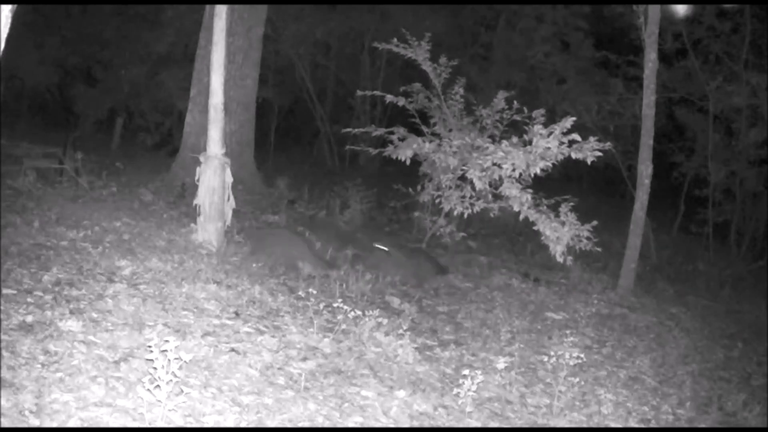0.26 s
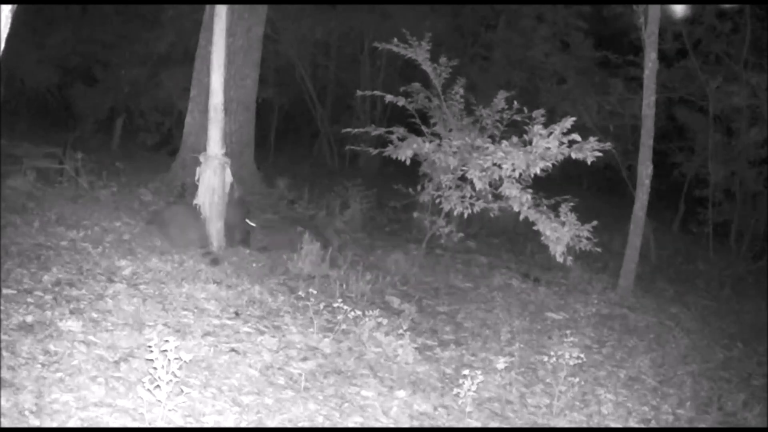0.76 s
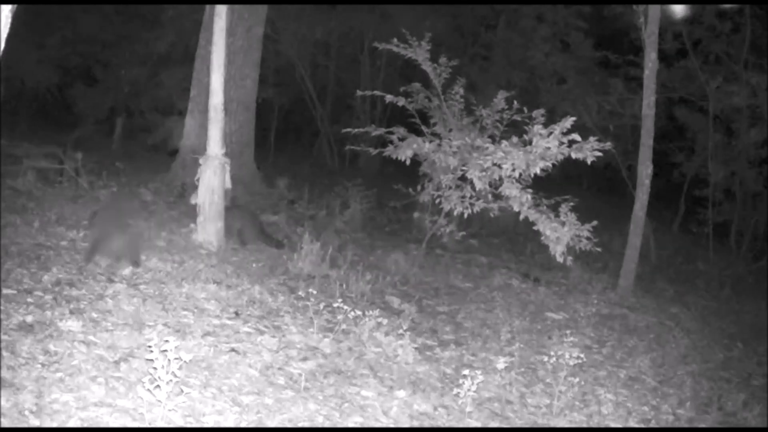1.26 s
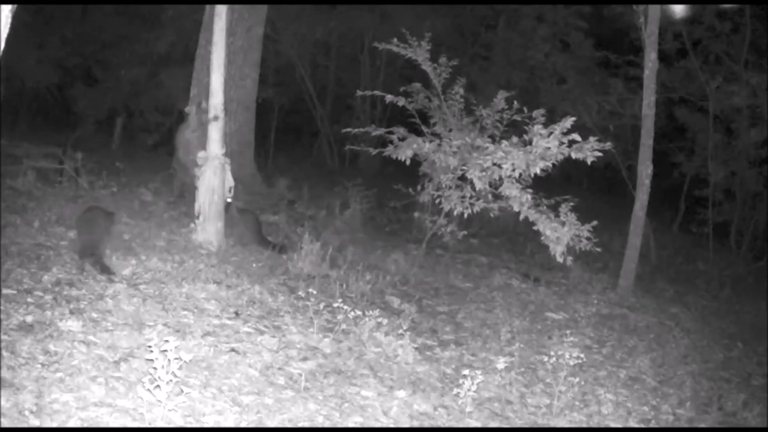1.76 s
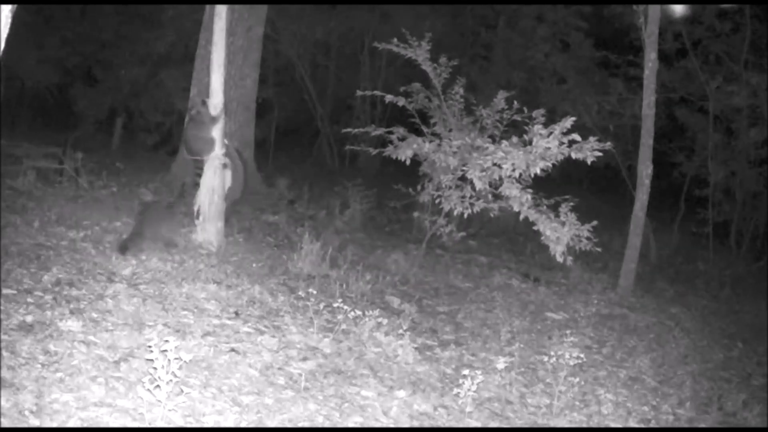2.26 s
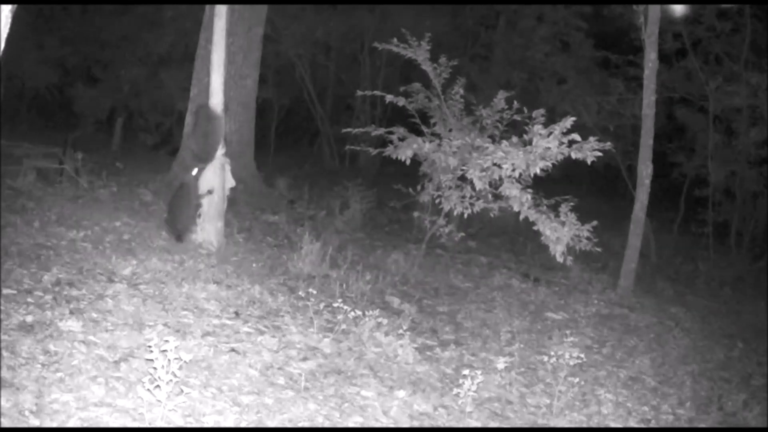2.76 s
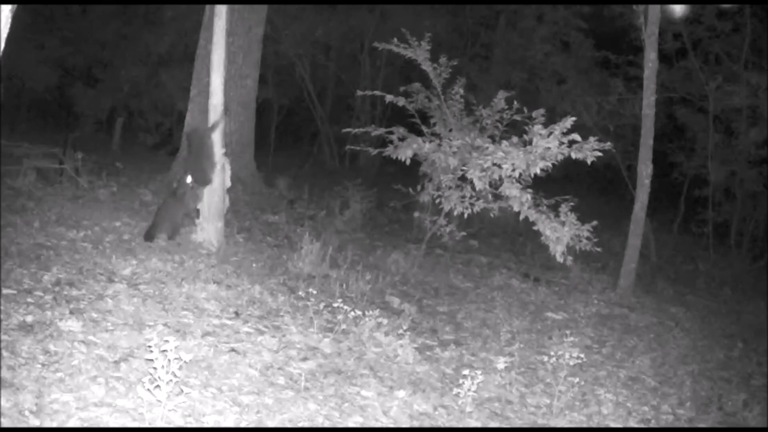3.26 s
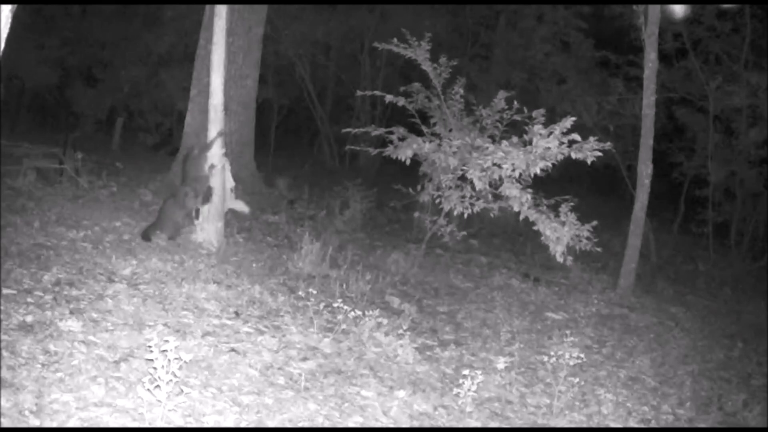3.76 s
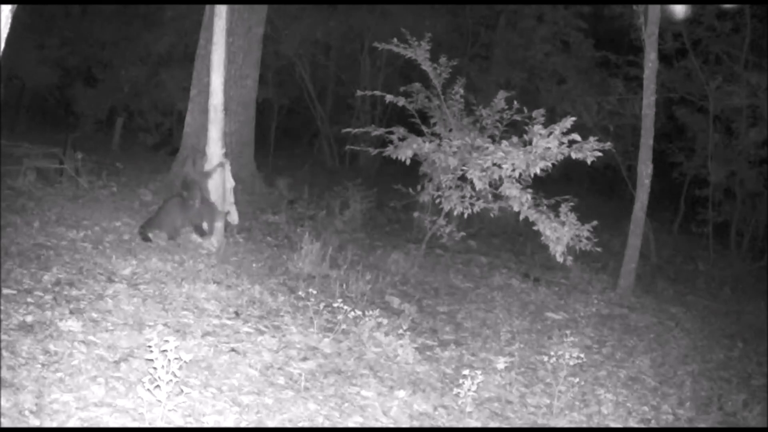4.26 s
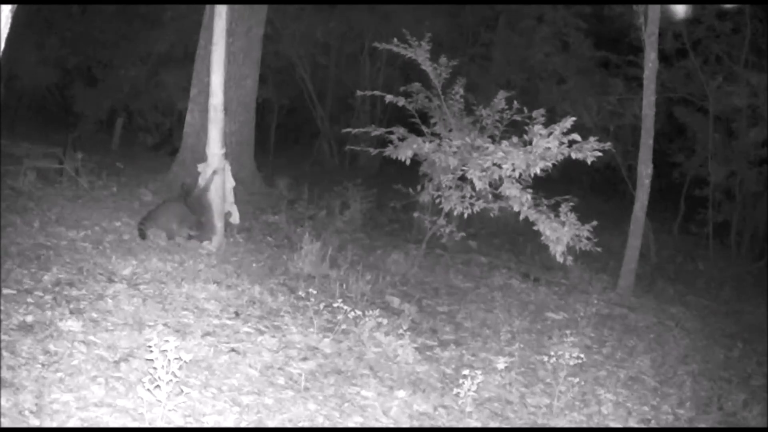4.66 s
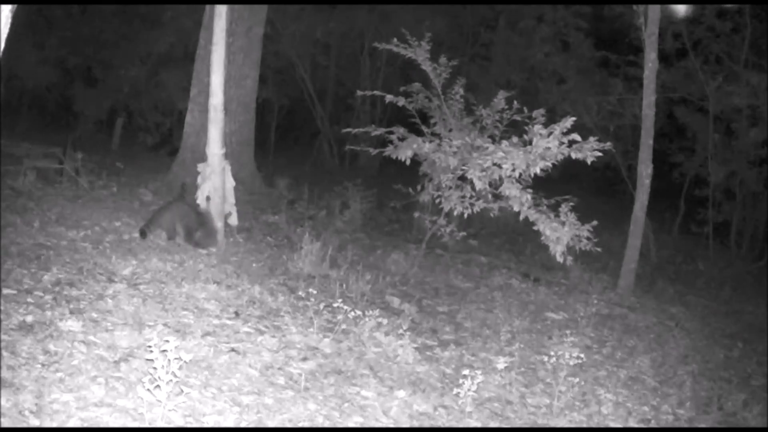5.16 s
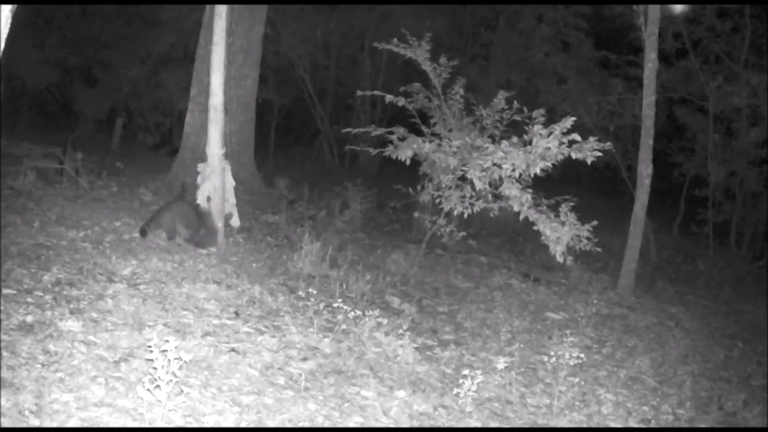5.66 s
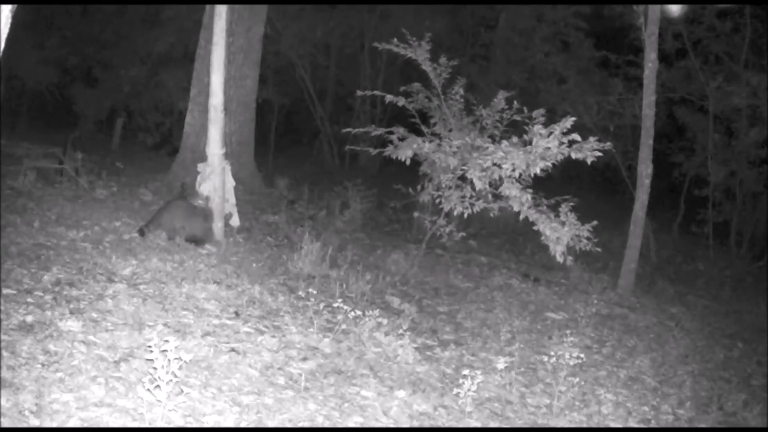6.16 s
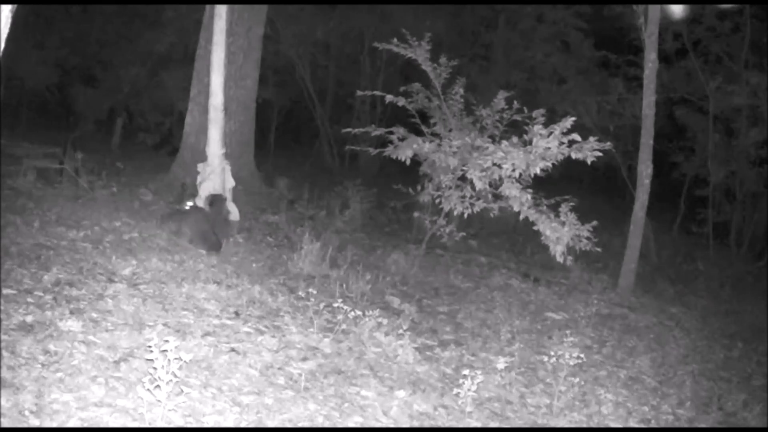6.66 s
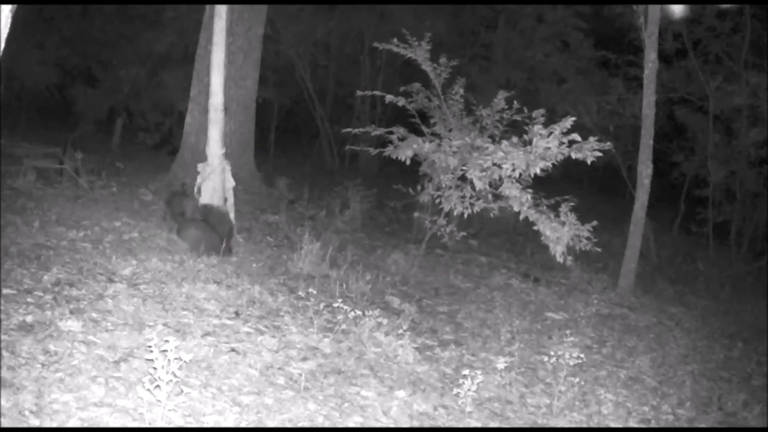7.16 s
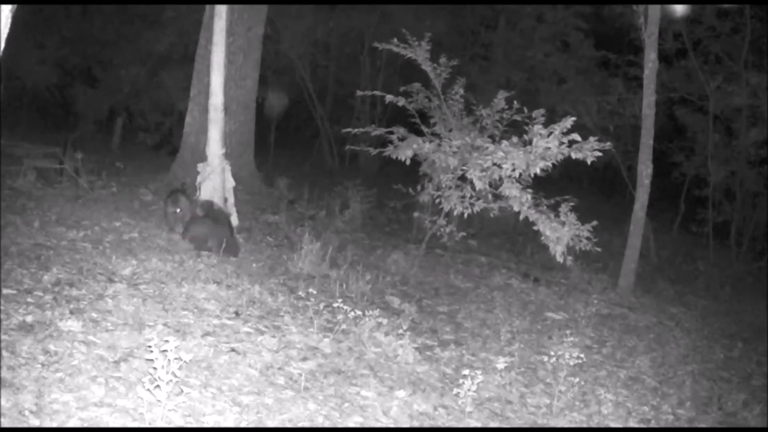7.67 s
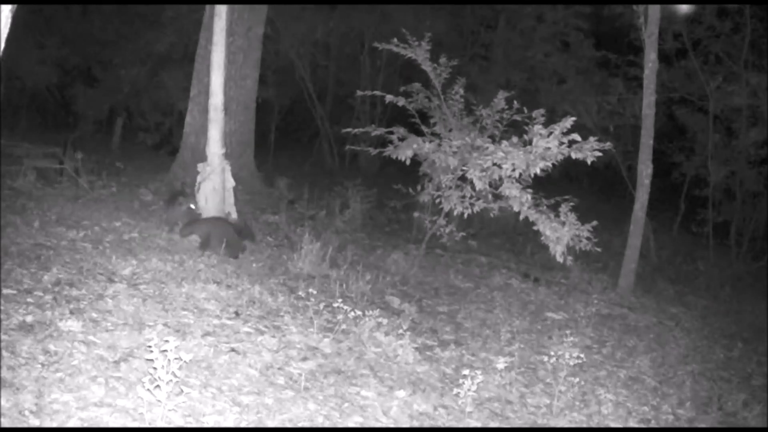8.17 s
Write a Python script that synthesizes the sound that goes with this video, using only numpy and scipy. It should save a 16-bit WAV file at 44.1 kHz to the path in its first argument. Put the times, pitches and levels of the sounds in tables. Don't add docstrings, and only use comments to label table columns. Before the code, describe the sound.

A dense high cricket chorus pulses steadily at night while katydids rasp short phrases and small animals rustle leaves and snap twigs.

```python
import sys
import numpy as np
from scipy import signal
from scipy.fft import rfft, irfft, dct, next_fast_len
from scipy.io import wavfile
from scipy.ndimage import map_coordinates

SR = 44100
rng = np.random.default_rng(int(sys.argv[2]) if len(sys.argv) > 2 else 0)


def invert_db(level):
    return 10 ** (np.asarray(level, dtype=float) / 20)


def master_out(mix):
    frames = np.transpose(np.atleast_2d(mix))
    ceiling = np.clip(frames, -1, 1)
    pcm = np.round(ceiling * 32767).astype(np.int16)
    wavfile.write(sys.argv[1], SR, pcm)


N = 370881

# (frequency [Hz], level [dB/Hz])
HIGH_BLUR = [(3290, -47.5), (5680, -26), (6140, 0), (6310, 4.5), (6590, 0), (7000, -10), (9100, -52),
             (15400, -120)]
# (frequency [Hz], level [dB/Hz])
HIGH_SKIRT = [(3940, -30.5), (6700, -7), (6950, -11), (7260, -8.5), (7950, -23.5), (8130, -41), (8250, -38),
              (10700, -65.5), (18200, -120)]
# (peak time [s], lift [dB])
CHIRPS = [(.06, 3.5), (.45, 5), (.8, 2.5), (1.2, 3.5), (1.55, 2), (1.92, 1.5), (2.2, 1.5), (2.49, 1.5),
          (2.81, 3.5), (3.16, 4), (3.5, 2), (3.87, 1.5), (4.21, 3), (4.6, 3.5), (4.93, 2.4), (5.29, 3),
          (5.68, 2), (6.04, 2.5), (6.38, 3.5), (6.8, 2), (7.12, 1.2), (7.49, 2), (7.85, 3), (8.22, 3.5)]
# (frequency [Hz], level [dB/Hz])
LOW_BLUR = [(1210, -41), (2050, -15.5), (2270, 6), (2360, 0.5), (2490, -8.5), (2600, -17), (3380, -37),
            (5720, -120)]
# (time [s], level [dB])
LOW_COURSE = [(0.0, -66), (1.17, -70.5), (2.62, -69.5), (3.35, -68.5), (4.36, -69), (4.89, -68),
              (5.36, -70), (5.76, -66.5), (6.7, -68.5), (7.89, -65.5), (8.27, -67.5), (8.41, -68.5)]
# (frequency [Hz], level [dB rms])
MAINS_LINES = [(120, -65.8), (240, -78.5), (360, -88), (60, -74)]
# (frequency [Hz], level [dB/Hz])
AIR_SPECTRUM = [(88, -39.5), (150, -8), (167, -10), (291, -13.5), (1640, -17), (2300, -17.5), (2610, -16),
                (4340, -17.5), (5550, -21.5), (6000, -6), (7800, -25.5), (13200, -120)]
# (frequency [Hz], level [dB/Hz])
RUMBLE_SPECTRUM = [(12, -35.5), (20, -3.5), (48, 1.5), (76, 2.5), (119, -2), (141, -4), (171, -15.5),
                   (220, -13.5), (290, -38.5), (480, -120)]
# (time [s], level [dB], length [s], centre [Hz], width [Hz])
PAW_SCUFFS = [(0.038, -70, 0.036, 1500, 2030), (0.536, -57.5, 0.1, 2100, 2600),
              (0.547, -64.5, 0.038, 400, 503), (0.928, -66, .12, 1500, 2500),
              (1.283, -49, 0.048, 6270, 5000), (1.293, -57.5, 0.044, 1000, 1800),
              (1.298, -63.5, 0.026, 330, 300), (1.33, -60, 0.18, 2180, 4000),
              (1.428, -53.5, 0.093, 4060, 5000), (2.198, -65.5, .05, 1010, 1200),
              (2.679, -66, .15, 1200, 1500), (3.209, -64, 0.31, 1190, 2010), (3.69, -61, 0.023, 204, 201),
              (4.685, -59.5, .03, 1500, 1500), (4.73, -65, 0.14, 1600, 1200),
              (4.997, -73, 0.14, 1180, 1500), (6.258, -60.5, .025, 280, 298),
              (6.982, -63, .018, 5000, 1490), (7.086, -60, 0.024, 1780, 352),
              (7.142, -60.5, 0.019, 4900, 1200), (8.338, -64, 0.038, 395, 150)]
# (time [s], peak [dB], main mode [Hz], low mode over main [dB], high modes over main [dB])
TWIG_SNAPS = [(0.059, -54, 1400, -1.5, 4), (0.531, -58.5, 1600, 4, 7), (0.931, -62, 1670, -1, 9),
              (1.01, -54, 1640, -11, -1), (2.046, -59, 902, 1.5, -6.5), (2.064, -41, 1720, -6, -4),
              (2.149, -56.5, 934, -5, -5), (2.349, -44.5, 1420, -15, -9.5), (2.609, -51.5, 1490, -23, -12),
              (2.921, -40, 1490, -3.5, -1), (3.191, -46, 1500, -9, -13), (3.219, -54, 1190, -12, -0.5),
              (3.255, -57, 1070, -18, 5.5), (3.731, -53, 1390, -18, -10), (3.777, -45, 1030, -5, -8.5),
              (4.047, -51.5, 1410, -16, -7), (4.118, -52.5, 1750, -24, -1.5), (4.695, -51, 1500, -13, -7),
              (5.683, -53.5, 1300, -16, -9), (6.601, -58.5, 950, 1.5, 11.5), (7.056, -56, 1760, -16, -13),
              (7.068, -46.5, 1820, -20, -22), (8.131, -60.5, 1000, 3.5, -6), (8.246, -50.5, 1150, -5.5, 2)]
# (frequency [Hz], width [Hz], level [dB])
WOOD_LOW = [(445, 606, 0)]
# (frequency [Hz], width [Hz], level [dB])
WOOD_HIGH = [(2920, 790, 0.5), (4470, 1000, 1.5), (7250, 1500, -2.5)]
# (time [s], level [dB])
NEAR_PHRASES = [
    (.213, -62),
    (1.525, -61),
    (3.01, -60.5),
    (4.538, -60.5),
    (6.022, -60.5),
    (7.455, -61),
]
# (time [s], level [dB])
FARTHER_PHRASES = [
    (1.33, -62),
    (3.848, -62),
]
# (frequency [Hz], width [Hz], level [dB])
NEAR_WING_MODES = [(3400, 1300, -4.5), (4830, 850, -0.5), (7540, 800, -6.5)]
# (frequency [Hz], width [Hz], level [dB])
FARTHER_WING_MODES = [(5000, 680, -0.5), (3354, 240, 2.5), (4340, 1500, -10.5)]
FAINT_LOSSES = [.119, .544, .653, .823, .865, 1.506, 2.487, 2.553, 3.406, 3.532, 3.68, 3.811, 4.152, 5.153,
                5.58, 5.645, 6.327, 6.946, 7.117, 7.203]

CHORUS_DB, FLUTTER_DB = -52.5, 0.76
CHIRP_RISE_S, CHIRP_FALL_S = 0.071, 0.125
SKIRT_DB, SKIRT_DRIFT_DB = -67.3, -0.5
AIR_DB, AIR_FADE_DB_PER_S = -67, 0.3051
RUMBLE_DB, HEAVE_DB = -64.3, 1.86
STROKE_GAP_S, STROKE_S = 0.099, 0.096
WARM_UP_DB = -1
LOSS_STEP_DB = 10.8
TOP_HZ = 8230


def unit(x):
    return x / np.sqrt(np.mean(x ** 2) + 1e-20)


def curves(rows):
    s, *cols = np.transpose(rows)
    return [np.interp(np.arange(N) / SR, s, c) for c in cols]


def wobble(rate):
    coarse = np.arange(0, N + 64, 64)
    knots = rng.standard_normal(int(N * rate / SR) + 5)
    return np.interp(np.arange(N), coarse, map_coordinates(knots, [coarse * rate / SR]))


def filtered(x, response):
    m = next_fast_len(len(x) + 2048)
    return irfft(rfft(x, m) * response(np.fft.rfftfreq(m, 1 / SR)), m)[:len(x)]


def noise(spectrum):
    hz, db = np.transpose(spectrum)
    shape = lambda f: invert_db(np.interp(np.log(f + 1), np.log(hz), db))
    return unit(filtered(rng.standard_normal(N), shape))


def steep(x, modes):
    def ring(f):
        total = 0
        for k, (centre, width, db) in enumerate(modes):
            damping = 1j * f * width
            total = total + (-1) ** k * invert_db(db) * damping / (centre ** 2 - f ** 2 + damping)
        return total
    return filtered(x, lambda f: ring(f) ** 2)


def trill(centre_hz, spread_hz, pulse_rate, glide_hz, swell_db, count):
    out = np.zeros(N)
    for pitch, (pace, size, start) in zip(np.linspace(-1.4, 1.4, count), rng.standard_normal((count, 3))):
        strokes_per_s = pulse_rate * (1 + 0.18 * pace + 0.06 * wobble(6))
        stroke = (np.cumsum(strokes_per_s) / SR + start) % 1
        hz = centre_hz + spread_hz * (pitch + 0.5 * wobble(25)) + glide_hz * (0.35 - stroke)
        gate = np.sin(np.pi * np.clip(stroke / 0.72, 0, 1)) ** 2
        tone = np.sin(2 * np.pi * np.cumsum(hz) / SR)
        out += invert_db(2.0 * size + swell_db * wobble(3.3)) * gate * tone
    return unit(out)


def swelling():
    t = np.arange(0, N / SR, 0.002)
    lift_db = np.zeros(len(t))
    for s, db in CHIRPS:
        late = t - s
        lift_db += db * np.exp(-(late / np.where(late < 0, CHIRP_RISE_S, CHIRP_FALL_S)) ** 2)
    return CHORUS_DB + np.interp(np.arange(N) / SR, t, lift_db) + FLUTTER_DB * wobble(24)


def crickets():
    near = trill(centre_hz=6380, spread_hz=100, pulse_rate=55, glide_hz=249.4, swell_db=0.6, count=11)
    high = invert_db(-2) * near + invert_db(-2.0 + 0.38 * wobble(18)) * noise(HIGH_BLUR)
    deep = trill(centre_hz=2289, spread_hz=55, pulse_rate=32, glide_hz=90.1, swell_db=1.0, count=5)
    low = invert_db(-3.5) * deep + invert_db(-4.5) * noise(LOW_BLUR)
    low_db = curves(LOW_COURSE)[0] + 1.5 + 0.96 * wobble(9)
    skirt_db = SKIRT_DB + SKIRT_DRIFT_DB * wobble(2.2) + 3.0 + 1.3 * wobble(20)
    return invert_db(swelling()) * high + invert_db(low_db) * low + invert_db(skirt_db) * noise(HIGH_SKIRT)


def background():
    t = np.arange(N) / SR
    hum = np.zeros(N)
    for hz, db in MAINS_LINES:
        hum += invert_db(db + 4.0 + 0.32 * wobble(3)) * np.sin(2 * np.pi * hz * t + 0.059 * wobble(1.1))
    drone_hz = 43.3 + 0.9 * wobble(3)
    drone = invert_db(-65 + 3.0 * wobble(3.4)) * np.sin(2 * np.pi * np.cumsum(drone_hz) / SR)
    air_db = AIR_DB - AIR_FADE_DB_PER_S * t + 8 + 0.65 * wobble(12)
    rumble_db = RUMBLE_DB + HEAVE_DB * wobble(4.5) - 2.0
    return hum + drone + invert_db(air_db) * noise(AIR_SPECTRUM) + invert_db(rumble_db) * noise(RUMBLE_SPECTRUM)


def leaves():
    out = np.zeros(N + SR)
    for s, db, length, hz, width_hz in PAW_SCUFFS:
        u = np.arange(int(2 * length * SR)) / (length * SR)
        grains = rng.standard_normal(len(u)) * invert_db(2.84 * rng.exponential(size=len(u)))
        crush = unit(steep(grains, [(hz, 1.3 * width_hz, 0)]))
        press = np.minimum(8 * u, 1) * np.exp(-1.2 * u ** 3)
        out[round(s * SR):][:len(u)] += invert_db(db) * crush * press
    return out[:N]


def twigs():
    out, t = np.zeros(N + SR), np.arange(800) / SR
    for s, db, mid_hz, low_db, high_db in TWIG_SNAPS:
        splinters = 0.09 * rng.standard_normal(len(t)) * invert_db(-60 * t / 0.011)
        blow = (t == 0) + splinters
        main = [(mid_hz, 0.75 * mid_hz, 0)]
        for share_db, modes in ((low_db, WOOD_LOW), (0, main), (high_db, WOOD_HIGH)):
            ring = -sum(steep(blow, [mode]) for mode in modes)
            out[round(s * SR) + 60:][:len(t)] += invert_db(6.0 + db + share_db) * ring / abs(ring).max()
    return out[:N]


def phrases(starts, count):
    strokes = []
    for s, db in starts:
        for k in range(count):
            strokes.append((s + k * STROKE_GAP_S, db + WARM_UP_DB * (k == 0), STROKE_S))
    return strokes


def katydid(strokes, wing, tooth_rate, scatter, blur):
    teeth, effort = np.zeros(N), np.zeros(N)
    tooth_count = np.cumsum(tooth_rate * (1 + scatter * wobble(40))) / SR
    at = np.flatnonzero(np.diff(np.floor(tooth_count)))
    teeth[at] = invert_db(2.4 * rng.standard_normal(len(at)))
    for s, db, length in strokes:
        u = np.linspace(0, 1, int(length * SR))
        effort[round(s * SR):][:len(u)] += invert_db(db) * np.abs(np.sin(np.pi * u ** 0.63)) ** 0.8
    tail = invert_db(-60 * np.arange(SR // 2) / SR / 0.39)
    echo_power = signal.fftconvolve(effort ** 2, tail ** 2 / np.sum(tail ** 2))[:N]
    lingering = np.sqrt(np.abs(echo_power))
    echoes = unit(steep(rng.standard_normal(N), wing))
    return effort * unit(steep(teeth, wing)) + blur * lingering * echoes


def scene():
    mono = crickets() + background() + leaves() + twigs()
    mono += katydid(phrases(NEAR_PHRASES, count=4), NEAR_WING_MODES, tooth_rate=245, scatter=0.06, blur=0.7)
    farther = phrases(FARTHER_PHRASES, count=3) + [(4.125, -64.5, STROKE_S)]
    mono += katydid(farther, FARTHER_WING_MODES, tooth_rate=230, scatter=0.1, blur=0.91)
    return np.array([mono, mono])


def lose_faint_tones(x):
    out, size = x.copy(), 1700
    window = 0.92 * np.hanning(size) ** 0.7
    hz = np.arange(size) * SR / (2 * size)
    for s in FAINT_LOSSES:
        i = round(s * SR) - size // 2
        tones = dct(x[i:i + size], norm="ortho")
        band_db = np.repeat(2.5 * rng.standard_normal(size // 20), 20)
        typical = np.median(np.abs(tones[hz < 5700]))
        faint = np.abs(tones) < invert_db(LOSS_STEP_DB - 1.5 + band_db) * typical
        lost = dct(tones * faint * (hz < 7600), type=3, norm="ortho")
        out[i:i + size] -= window * lost
    return out


def roll_off(x):
    return signal.sosfilt(signal.butter(12, 8450, fs=SR, output="sos"), x)


def record(dry):
    mono = filtered(dry[0], lambda hz: (hz < TOP_HZ) * (hz > 18) / (1 + (hz / 7900) ** 50))
    edge = filtered(mono, lambda hz: 1 / (1 + (7850 / (hz + 1)) ** 60))
    flicker = invert_db(5 * np.clip(wobble(30), -3, 1))
    mono = lose_faint_tones(mono + edge * (flicker - 1))
    return roll_off(np.array([mono, mono]))


dry = scene()
out = record(dry)
master_out(out)
```